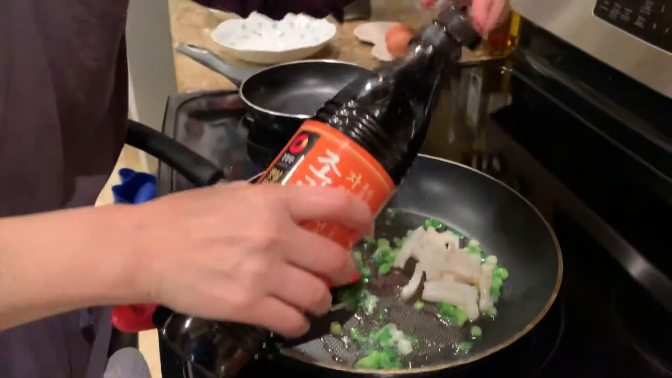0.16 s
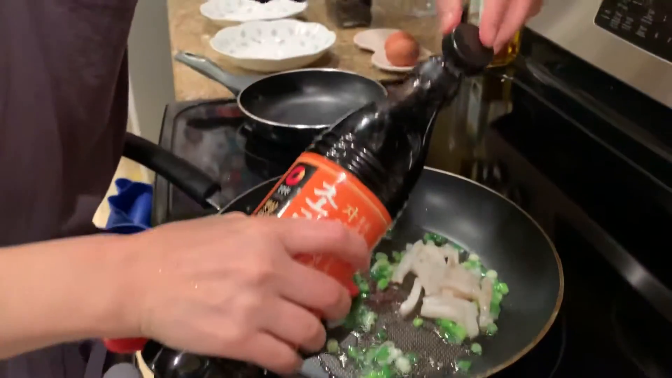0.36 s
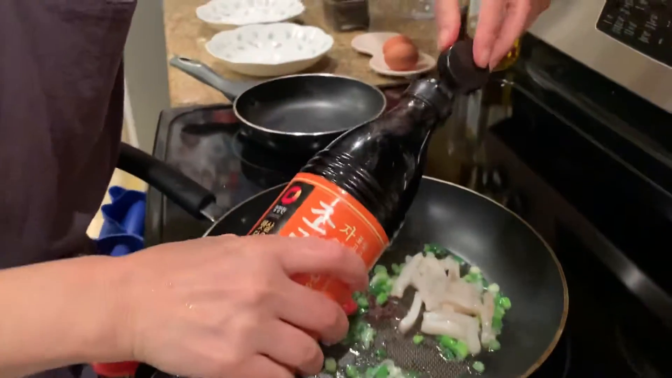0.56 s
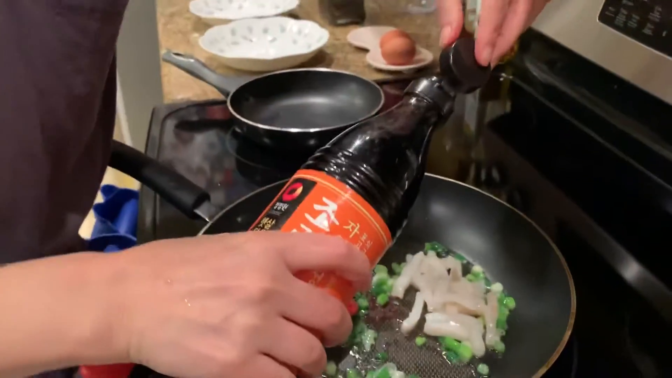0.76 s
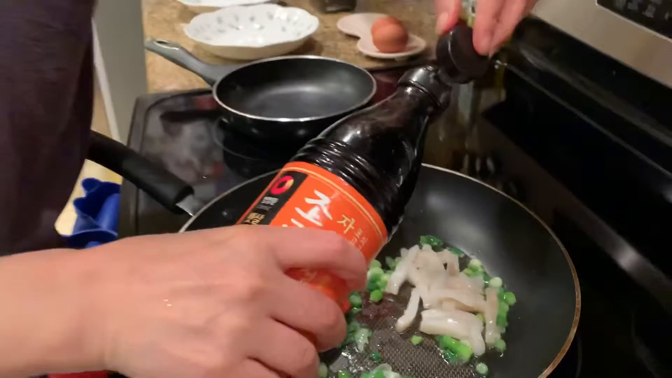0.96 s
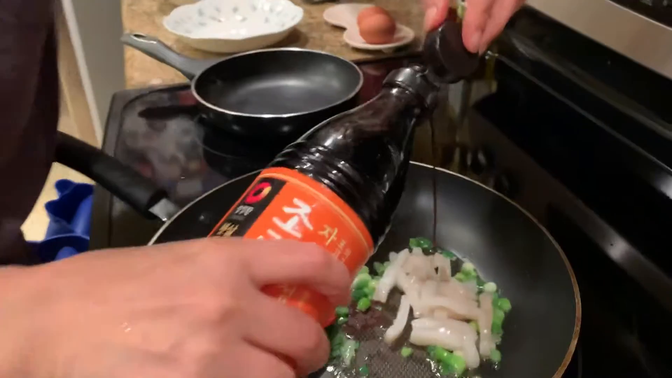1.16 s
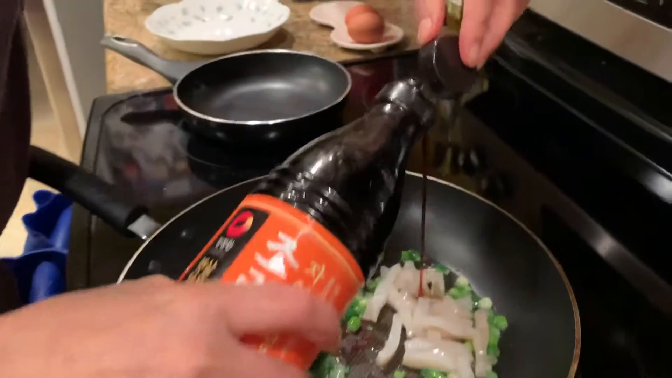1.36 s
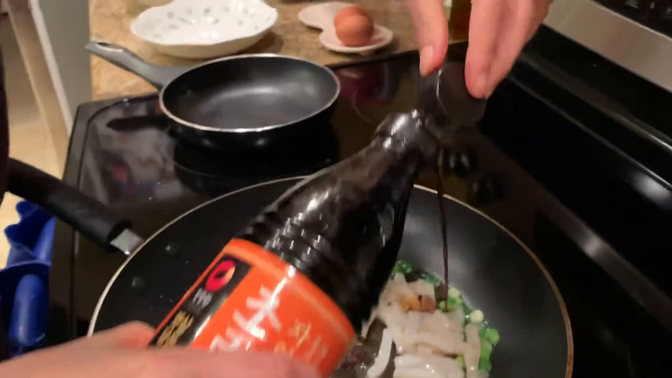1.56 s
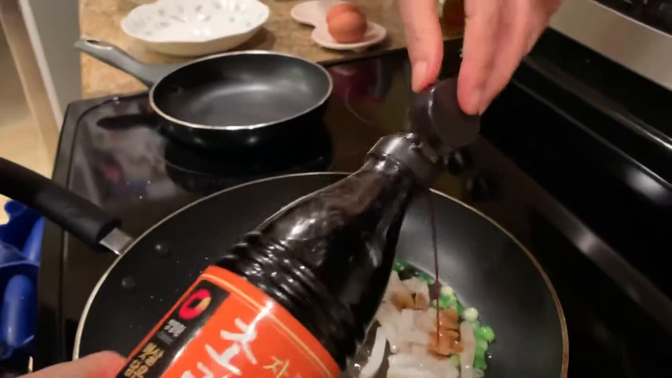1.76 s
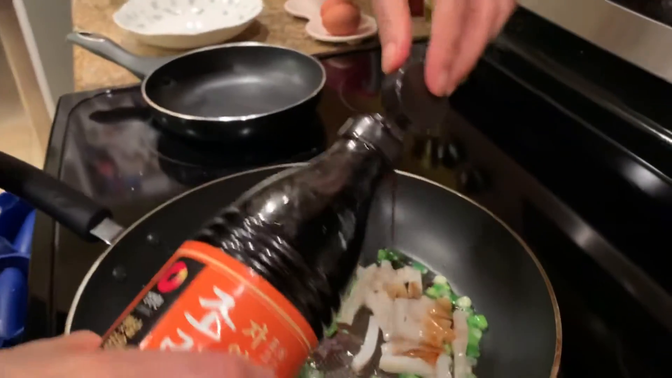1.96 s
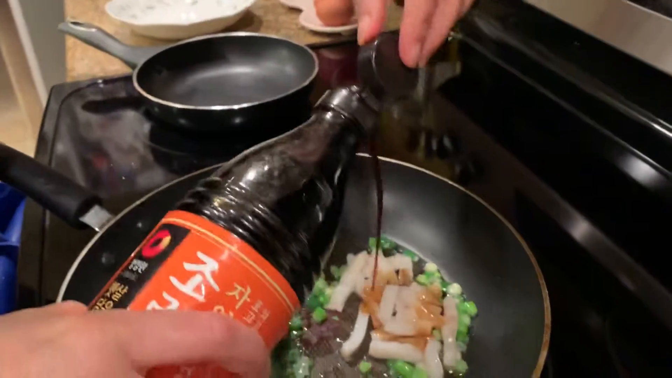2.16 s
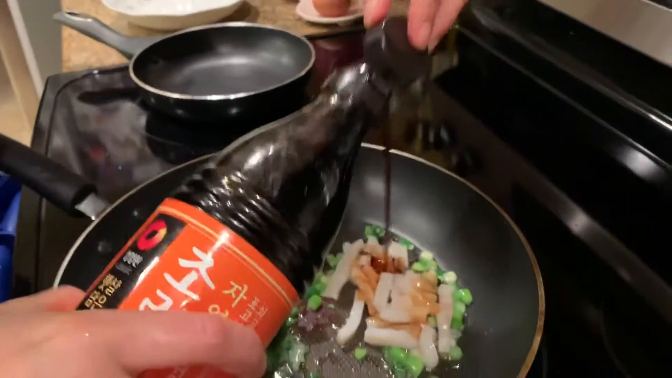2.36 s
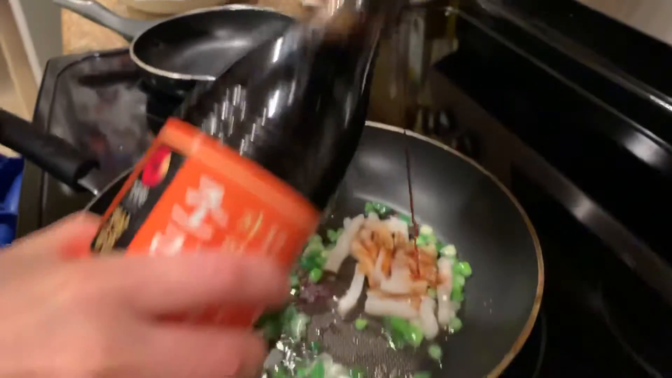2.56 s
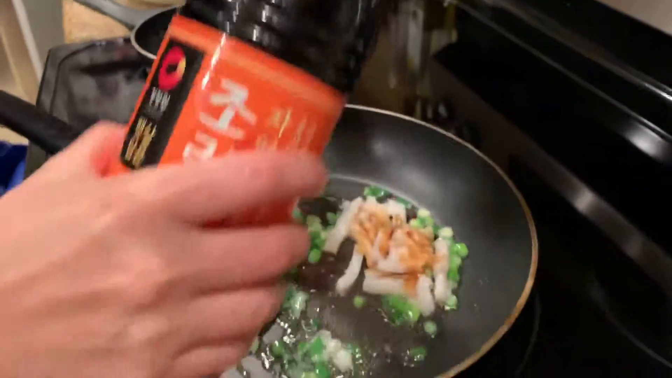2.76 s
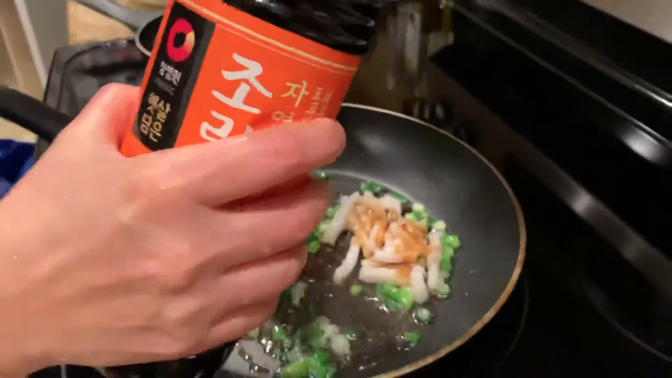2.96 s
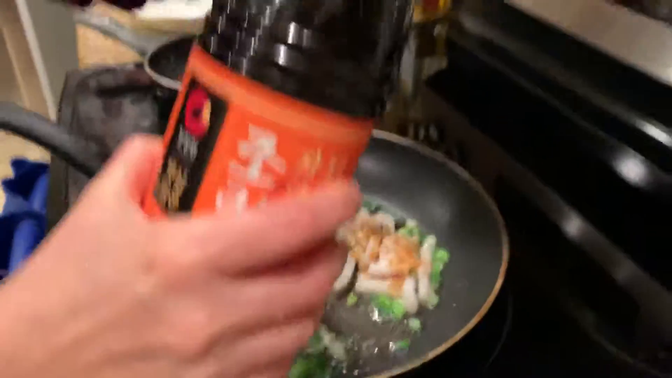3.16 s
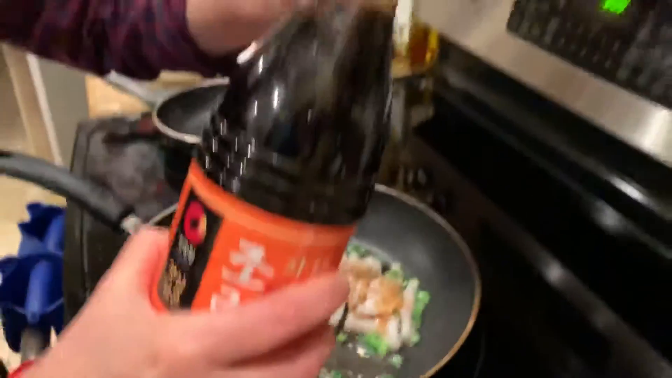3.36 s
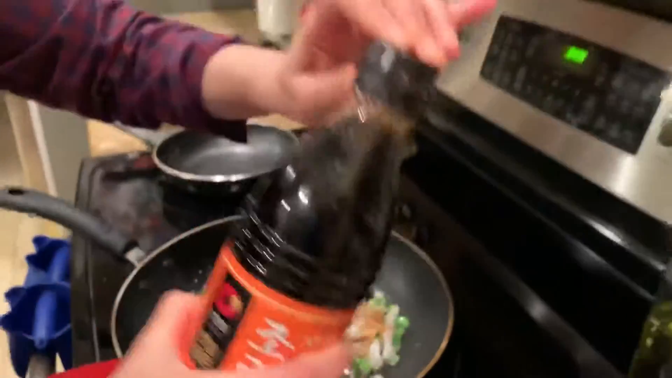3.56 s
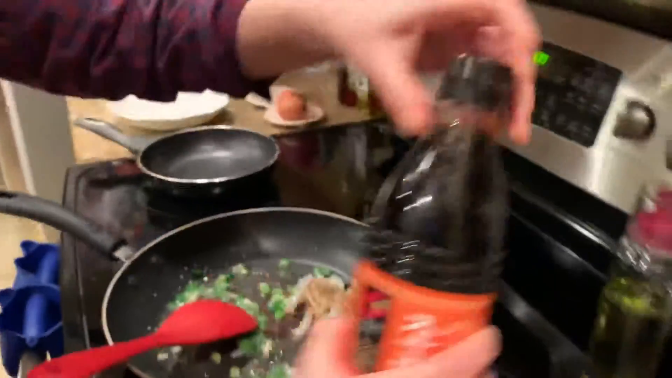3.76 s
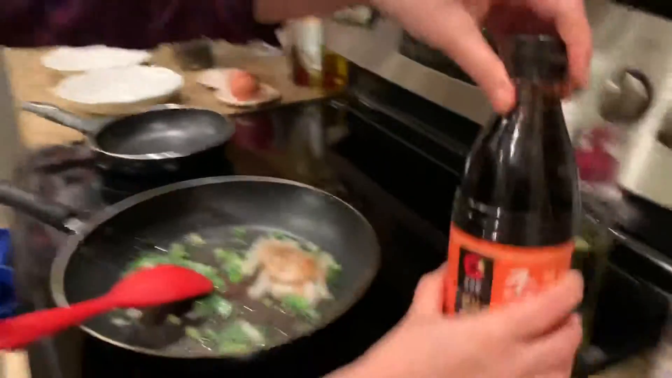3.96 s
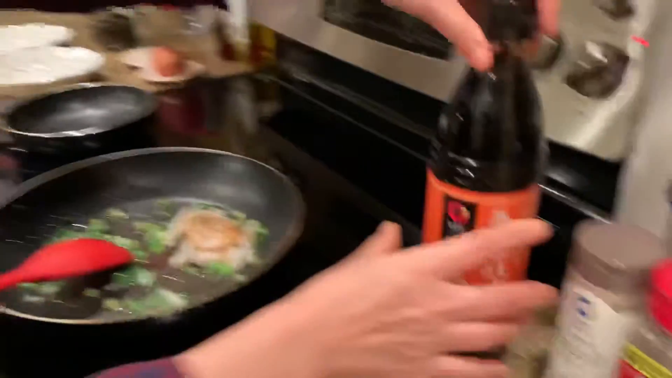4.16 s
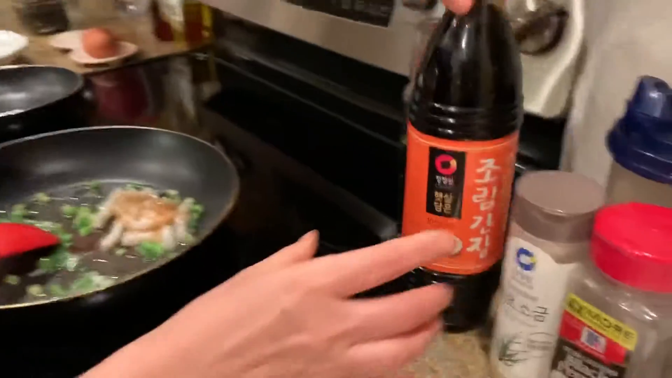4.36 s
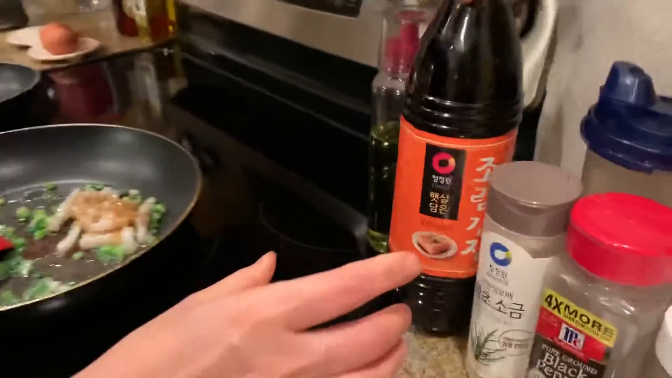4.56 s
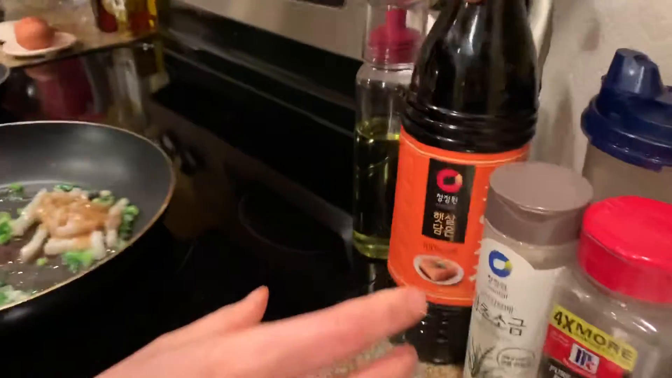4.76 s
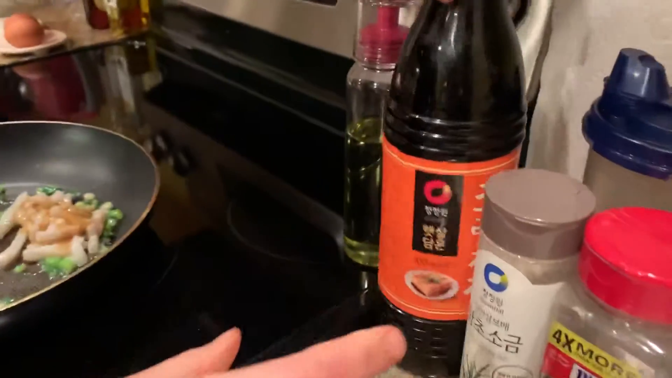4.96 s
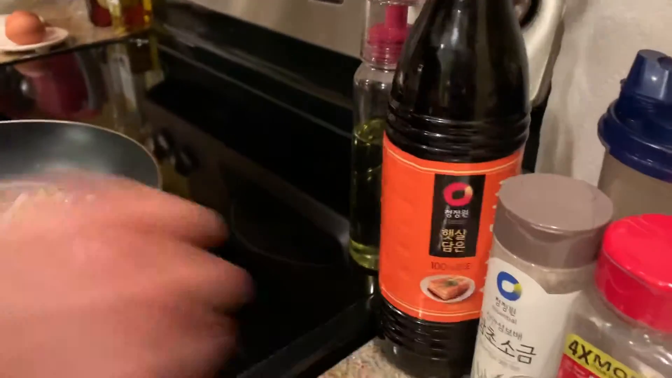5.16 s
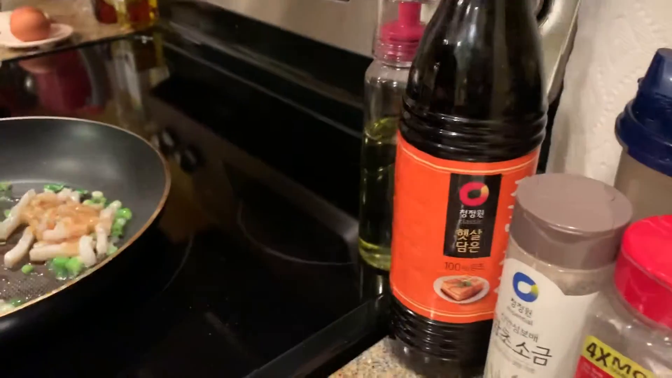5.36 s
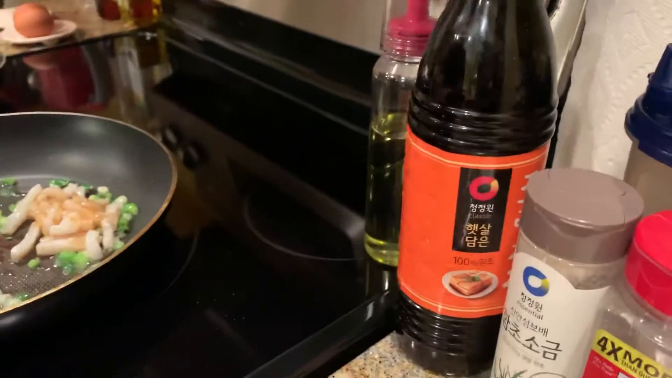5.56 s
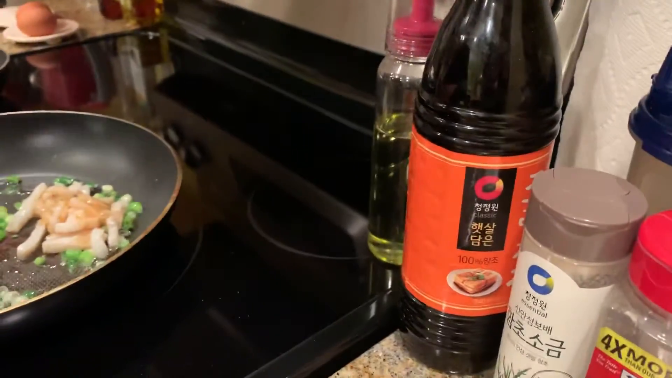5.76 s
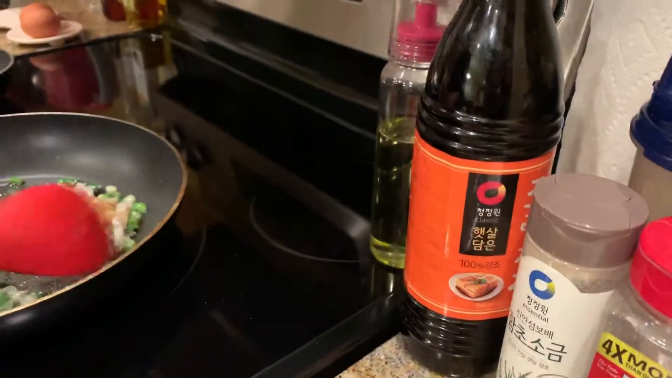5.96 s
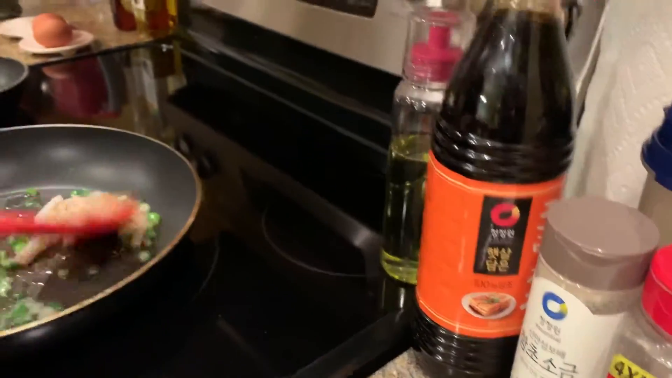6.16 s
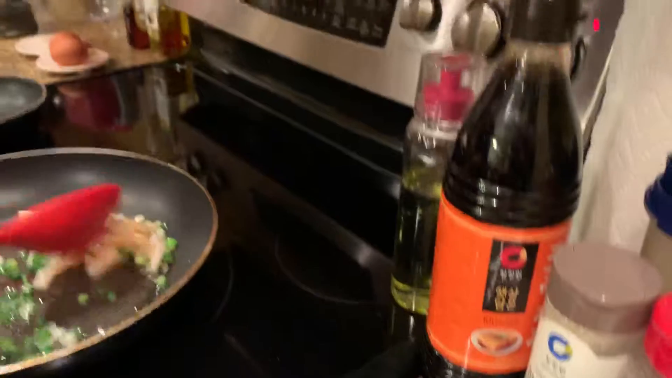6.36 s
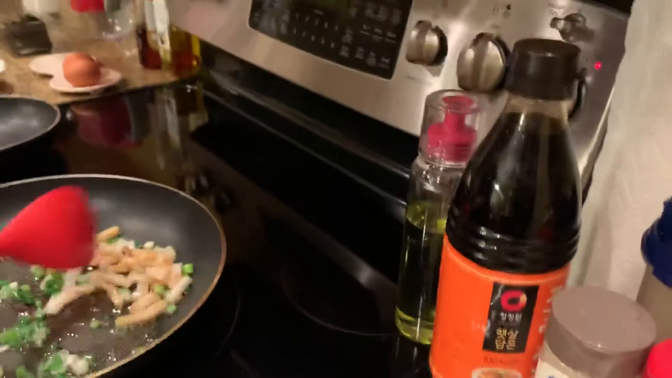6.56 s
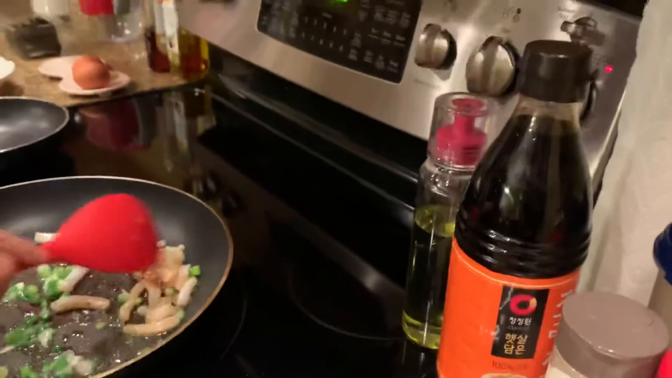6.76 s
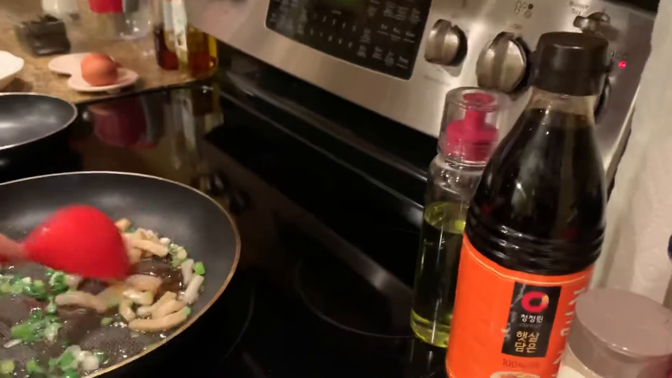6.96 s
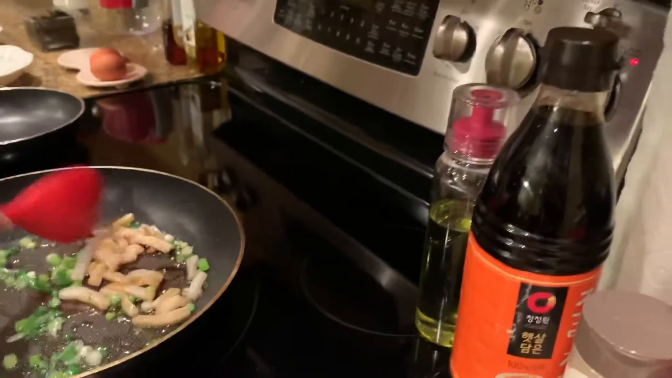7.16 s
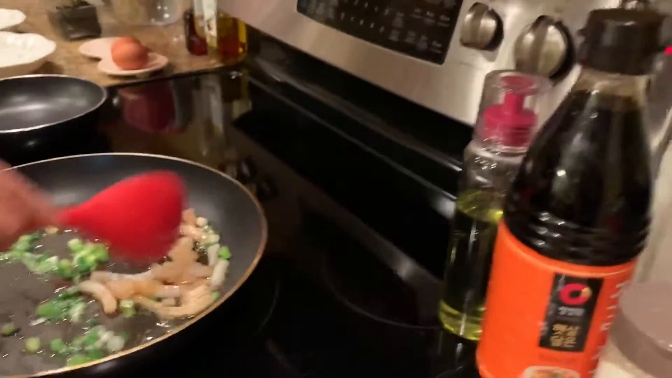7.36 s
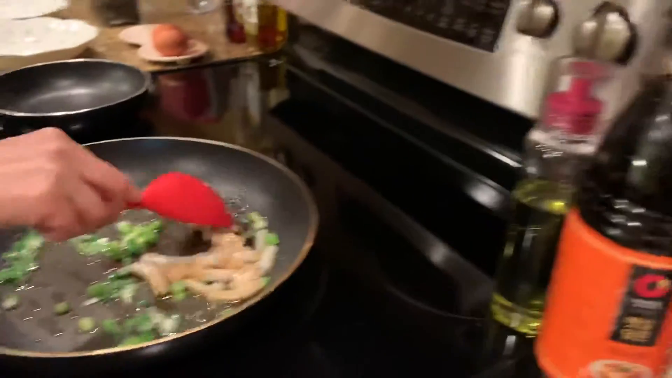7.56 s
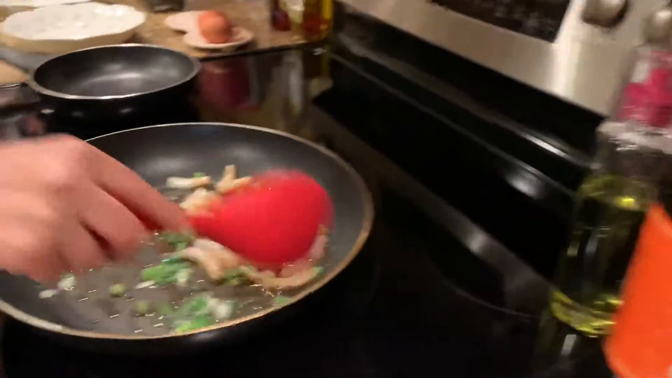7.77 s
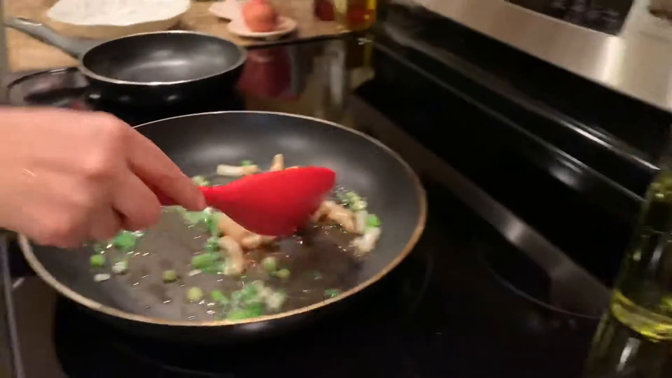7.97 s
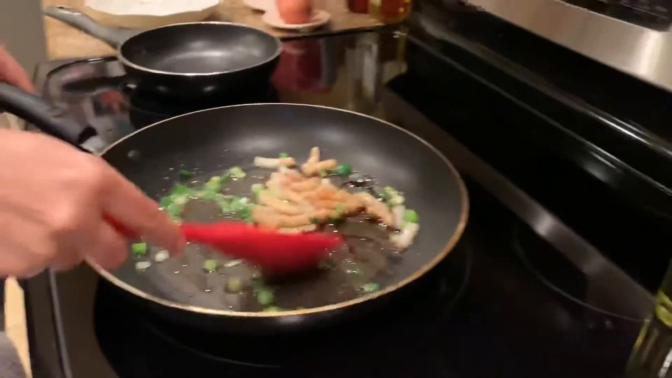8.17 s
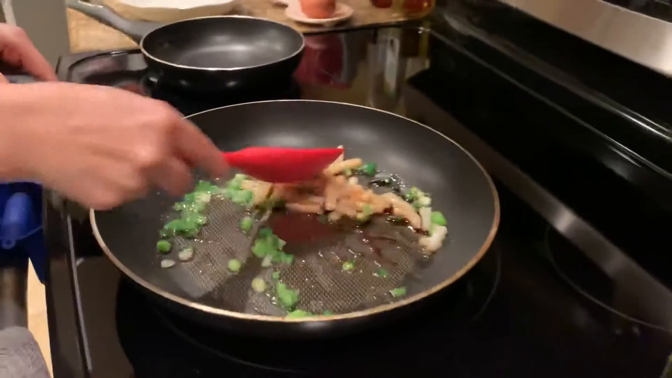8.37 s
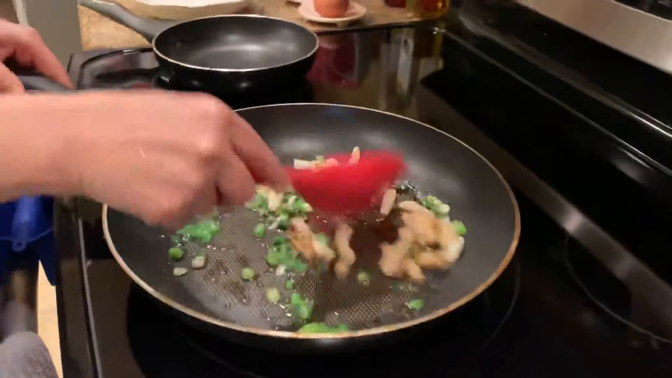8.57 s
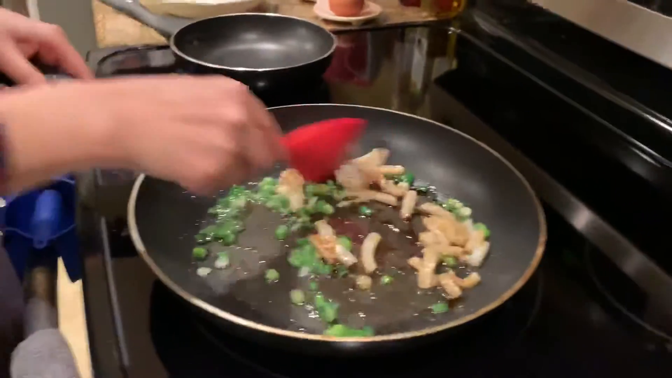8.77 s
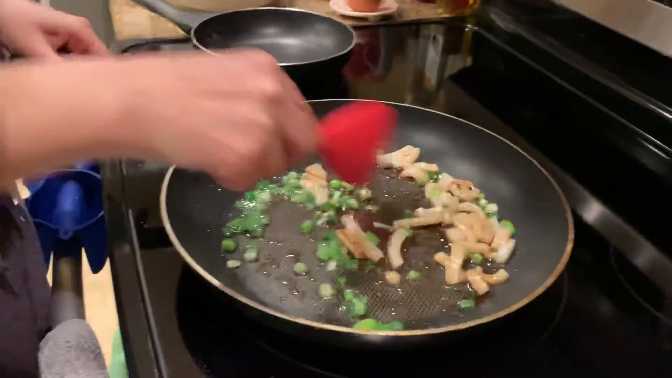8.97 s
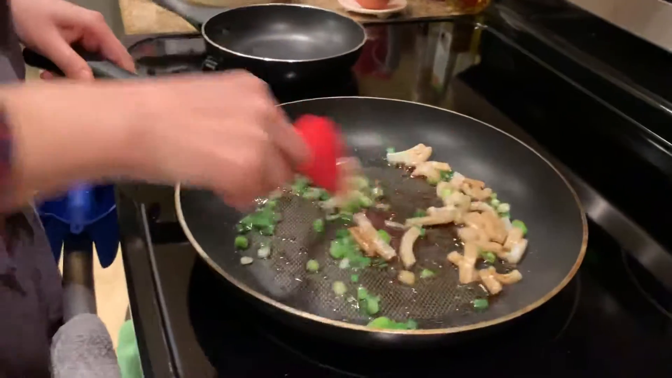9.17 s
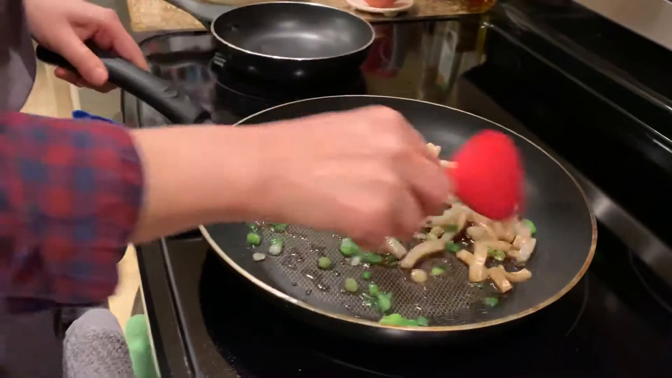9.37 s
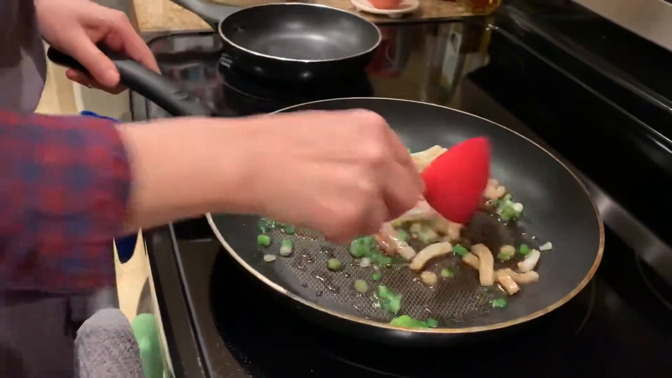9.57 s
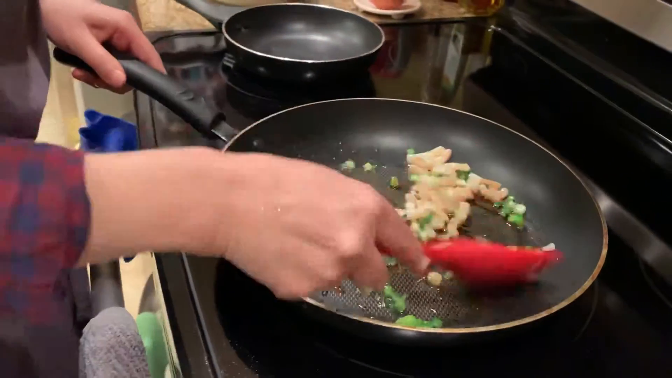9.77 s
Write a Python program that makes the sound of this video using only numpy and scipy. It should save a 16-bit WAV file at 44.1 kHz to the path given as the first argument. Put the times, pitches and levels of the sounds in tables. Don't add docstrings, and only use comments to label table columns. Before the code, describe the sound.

Close handheld stereo in a small kitchen. From 0 s a dense, bright sizzle of food in oil, with fine crackle, wet sauce bubbling and single spits. At about 0.9 s a bottle cap flips open with a small click. The frying swells from 0.7 to 2.4 s as sauce lands, with thin steam hisses, fizzes and plops, and a very sharp spit at 2.4. It then eases to a quieter simmering crackle. At 3.5 s the cap snaps shut firmly. Around 4.3 s the bottle lands on the stone counter with a low bump, then rattles and rocks at 4.7-5.3. A light spatula touch comes at 5.8, then dull thumps on the pan at 6.1, 6.7, 7.2, 7.9, 8.2, 8.8, 9.2 and 9.8, with sizzle surging strongly at 6.15 and 7.3, and more lightly later. Faint low house rumble lies underneath; room reflections are short.

```python
import sys
import numpy as np
from scipy import signal
from scipy.fft import rfft, irfft, next_fast_len
from scipy.io import wavfile
from scipy.ndimage import uniform_filter1d

SR = 44100
rng = np.random.default_rng(int(sys.argv[2]) if len(sys.argv) > 2 else 0)


def digitize_waveform(pressure):
    field = np.atleast_2d(pressure).T
    bounded = np.clip(field, -1, 1)
    quanta = np.round(bounded * 32767).astype(np.int16)
    wavfile.write(sys.argv[1], SR, quanta)


def volts_from_decibels(level):
    exponent = np.asarray(level, float) / 20
    return 10 ** exponent


N = 432621

# t/s, vigour/dB, wetness (sauce against crackle)/dB, loudest pocket f/Hz
FRYING = [(0, -44, -3.5, 3930), (.7, -41.5, -4.5, 3930), (1.2, -41, -4, 3480), (1.45, -40, -3.5, 2970),
          (2.0, -41.5, -2, 2780), (2.35, -41, -2, 3300), (2.6, -44, -1, 2800), (3.3, -46, -2, 3160),
          (3.8, -49.5, 0.9, 3880), (4.5, -46.5, -3.5, 3900), (5.05, -48.5, -1.6, 2980),
          (5.45, -48, 1, 3150), (5.9, -49, 0, 3630), (6.3, -48.5, -6.5, 4480), (7.3, -47.5, -6, 4080),
          (7.8, -48, -6.5, 3050), (8.6, -47, -4, 2680), (9.81, -48.5, -2, 3230)]
# t/s, surge/dB
STROKE_SURGES = [
    (6.15, 6.5),
    (7.33, 6.5),
    (7.9, 1.5),
    (8.2, 3),
    (9.26, 2.5),
]
# f/Hz, level per Hz/dB
CRACKLE_COLOUR = [(3000, -49), (4500, -0.5), (5600, 1.5), (7000, 9.5), (8300, 16), (10000, 13), (13000, 11),
                  (15800, 11.5)]
SAUCE_COLOUR = [(1200, -47.5), (1700, -12), (2100, 10.5), (2700, 19), (3400, 24), (4200, 27), (5200, 22.5),
                (6500, -60)]
SIMMER_COLOUR = [(260, -20), (380, -19), (600, 7), (850, 13), (1100, 10), (1450, 8.5), (2000, 14.5)]
# f/Hz, share [0-1]
COMMON_SHARE = [(100, 0.9), (500, .97), (1000, 0.8), (2000, 0.68), (3500, 0.55), (5500, 0.35)]
# f/Hz, width/Hz, level/dB
BOWL_MODES = [(619, 11, -4), (821, 34, -1), (959, 30, -3.5), (1414, 22, 5.5), (1817, 170, 0),
              (2094, 230, -2), (2465, 59, 1), (2780, 32, -9.5), (4360, 100, -13)]
# t/s of the peak, level/dB
SHUDDER_PEAKS = [(0.005, -55.5), (3.5, -72), (4.43, -82), (4.83, -59), (5.19, -81), (5.799, -68),
                 (6.08, -59), (7.92, -53), (8.25, -61), (9.32, -64)]
# f/Hz, level/dB
RUMBLE_COLOUR = [(20, 13), (40, 17.5), (65, 11.5), (120, 6.5), (200, -0.5), (400, -64)]
# t/s, peak level/dB, f/Hz
FIZZ_EVENTS = [(0.0233, -28.5, 4500), (0.119, -30, 4100), (0.5906, -56, 3620), (0.619, -26.5, 4250),
               (0.699, -29, 3600), (0.748, -31, 3540), (0.911, -27.5, 1870), (0.9112, -29.5, 2640),
               (1.118, -28.5, 3900), (1.2356, -36, 3960), (1.257, -29, 3330), (1.3374, -26.5, 3120),
               (1.4511, -26.5, 3190), (1.5, -32, 2540), (1.6378, -31.5, 2700), (1.69, -35, 2760),
               (1.7883, -30.5, 2120), (1.99, -49, 2120), (2.0363, -26, 2610), (2.242, -29, 4050),
               (2.2737, -31, 3980), (2.335, -25, 2780), (2.3948, -21.5, 4130), (2.395, -29, 2370),
               (1.462, -24, 4700), (2.5064, -27, 3800), (3.0542, -36, 2460), (3.2316, -36, 2460),
               (3.4342, -34, 2390), (3.4538, -34, 2520), (3.479, -32.5, 1820), (3.61, -81, 4420),
               (3.6257, -36, 1970), (4.197, -35, 3600), (4.989, -31, 3870), (5.678, -28, 3720),
               (6.1165, -34, 3600), (6.4345, -31, 3720), (6.7989, -32, 4350), (8.6903, -34, 2860),
               (8.762, -35, 3070), (8.9214, -30.5, 1900), (9.2396, -46, 1910), (9.2519, -38, 2750),
               (9.4519, -37, 3960), (9.4519, -34, 3860), (9.543, -39, 2500), (9.6016, -37.5, 2320)]
# t/s, length/s, f/Hz, level/dB
STEAM_VENTS = [(0.084, 0.32, 4120, -53), (0.48, 0.31, 3670, -49), (1.1, 0.136, 3800, -55),
               (1.25, 0.12, 3300, -62), (1.6, .08, 5700, -62), (1.57, 0.117, 3020, -44.5),
               (1.5, 0.33, 2600, -62), (2.03, 0.061, 2840, -47.5), (2.13, 0.26, 3000, -50.5),
               (1.5, .2, 4050, -51), (2.4, 0.1, 3880, -45), (1.3, .06, 4500, -48), (1.6, 0.049, 7900, -37),
               (1.56, 0.04, 9100, -35), (2.6, 0.073, 8000, -41), (6.1, .08, 832, -55),
               (7.7, .12, 1420, -62.5), (5.04, .1, 630, -56), (4.7, .04, 1150, -60),
               (5.55, 0.28, 2200, -59), (4.6, 0.288, 2200, -58)]
# t/s, peak level/dB, crack against ring/dB
SNAP_EVENTS = [(0.1755, -29, 7), (0.1935, -24, 7), (0.4803, -30, 7), (0.9123, -26, 7), (0.9692, -29, 7),
               (1.2131, -24, 7), (1.3598, -27, 7), (1.4506, -24, 7), (1.5, -19, 7), (1.5284, -27, 7),
               (1.7489, -27, 7), (1.9051, -27, 7), (2.152, -22, 7), (2.1899, -31, 7), (2.2752, -29, 7),
               (2.394, -12, 7), (2.4818, -26, 7), (2.5277, -24, 7), (3.4526, -30, 7), (3.4775, -34, 7),
               (3.6264, -25, 7), (3.8072, -25, 7), (3.8911, -26, 7), (3.9464, -32, 7), (4.1974, -26, 7),
               (4.2428, -30, 7), (4.7805, -30, 7), (1.5913, -25, 7), (6.1055, -30, 7), (6.318, -31, 7),
               (4.2572, -28, 7), (4.4233, -25, 7), (4.5151, -36, 7), (4.5341, -25, 7), (4.7087, -23, 7),
               (5.2116, -29, 7), (5.6206, -29, 7), (6.4363, -23, 7), (6.4812, -25, 7), (6.7987, -23, 7),
               (6.9511, -23, 7), (7.0658, -33, 7), (7.216, -23, 7), (7.3282, -31, 7), (7.6934, -21, 7),
               (8.1998, -21, 7), (8.2192, -30, 7), (8.3704, -32, 7), (8.6383, -31, 7), (8.7605, -25, 7),
               (8.8403, -31, 7), (9.0178, -29, 7), (9.3217, -31, 7), (9.394, -31, 7), (9.4564, -27, 7)]
# t/s, peak level/dB, f/Hz
PLOP_EVENTS = [(0.366, -30, 760), (1.463, -23, 3300), (2.397, -31, 1320), (1.268, -28.5, 890),
               (1.555, -29, 1890), (1.938, -31, 840), (2.13, -35, 615), (2.43, -28.5, 790),
               (2.481, -21, 1960), (2.708, -27.5, 680), (3.053, -33, 770), (3.232, -32, 480),
               (3.329, -32.5, 770), (4.454, -32, 554), (5.428, -33.5, 820), (6.184, -32.5, 830),
               (7.633, -33, 816), (8.76, -31, 1160), (9.073, -32, 910), (9.276, -28, 770),
               (9.601, -23, 860), (7.705, -31.5, 815), (6.672, -29.5, 860), (7.59, -42, 704),
               (4.665, -36, 600), (4.615, -39, 494), (9.791, -30, 754)]
# t/s, peak level/dB, f/Hz, crack against ring/dB
SPIT_EVENTS = [(0.4803, -32, 7370, -8), (2.072, -36, 8000, -18), (1.4528, -15, 7940, -13),
               (3.5748, -33, 8200, -8), (3.9853, -32, 7400, 0), (2.3351, -22.5, 8160, -16),
               (2.395, -12, 8160, 2), (2.4798, -19.5, 8800, -11), (2.5267, -31, 8400, 1),
               (2.6655, -16, 7100, -37), (2.9254, -23, 8400, -18), (3.4544, -27, 6800, 2),
               (3.8911, -51, 7500, 2), (3.9464, -35, 7300, 11), (4.424, -67, 8620, -12),
               (4.6808, -35, 8500, 3), (4.9242, -29, 8500, -10), (5.3612, -36, 8090, -17),
               (4.8183, -25, 8700, -11), (5.4282, -36, 8700, -8), (5.6232, -24, 8300, -79),
               (6.7196, -30, 4900, -8), (7.4583, -23, 8100, -11), (7.665, -21, 7900, -22),
               (7.7267, -31, 8080, -25), (8.447, -31, 7900, -29), (8.7615, -37, 4970, 1),
               (8.9635, -29, 8900, 1), (9.069, -33, 8500, -5), (9.2604, -26, 7800, 1)]
# t/s, peak level/dB
HARD_CRACKS = [(2.3942, -10), (3.627, -25), (3.8911, -26), (4.1976, -24), (6.7989, -27), (7.216, -23),
               (7.6934, -23), (8.2, -22), (9.0178, -27)]
# t/s, air in the neck level/dB, cap against it/dB
CAP_MOVES = [
    (0.91, -56.5, 18.5),
    (3.479, -25, 0.5),
]
# f/Hz, level/dB, t60/s
NECK_MODES = [(185, -5.5, 0.051), (307, -1, 0.02)]
CAP_MODES = [(426, 0, 0.057), (633, 5.5, 0.032), (770, -4, 0.075), (860, 5, 0.036), (1150, 1, 0.03),
             (1310, -10, 0.069), (1830, -11, 0.031), (2440, -11, 0.012), (2980, -3, .012)]
# t/s, peak level/dB, edge hardness/dB
SPATULA_THUMPS = [(5.828, -34.5, -8), (2.71, -44, -14), (6.073, -18, -8.5), (6.128, -27, -9),
                  (7.59, -53, -14), (6.378, -52, -11), (6.667, -18, -18.5), (6.949, -67, 9),
                  (7.247, -21.5, -24), (7.876, -25, -13.5), (7.919, -29.5, -12), (8.172, -26.5, -21),
                  (8.813, -26, -43), (9.212, -19, -22), (9.271, -42, -10), (9.538, -31.5, -36),
                  (9.78, -25.5, -12)]
# f/Hz, level/dB, t60/s
HOB_MODES = [(62, -15, 0.56), (74.5, -13.5, 0.47), (117.1, -11.5, 0.44), (147.3, 0, 0.12), (166, 3, 0.11),
             (207.6, -4.5, 0.12)]
PAN_EDGE_MODES = [(241, -2.5, 0.12), (343, -7, 0.06), (447, -9.5, 0.098), (530, -12, 0.05),
                  (644, -20, 0.013), (805, -16.5, 0.058)]
# t/s, counter boom level/dB, bottle against it/dB
BOTTLE_KNOCKS = [(4.149, -79, 21), (4.292, -24.5, -9.5), (4.335, -22, -19.5), (4.732, -39, 1.5),
                 (4.746, -38.5, -2.5), (4.76, -32, -7), (4.804, -40, 0), (4.814, -41, -7),
                 (4.824, -41, -6.5), (4.833, -45, -7), (4.881, -50, -3), (5.004, -44, -12),
                 (5.147, -33.5, -16.5), (5.2, -34.5, -21), (5.27, -41, -20)]
# f/Hz, level/dB, t60/s
COUNTER_MODES = [(43.8, -9.5, 1), (60.6, -9, 1), (82.6, 1, 0.28), (113.5, -3.5, 0.26), (132.6, -3, 0.23),
                 (196, -3, 0.11)]
BOTTLE_MODES = [(251, 6, 0.087), (314, 6.5, 0.047), (400, -4, 0.12), (545, 4.5, 0.069), (599, 5.5, 0.051),
                (718, -3, 0.062), (910, -3.5, 0.065), (1197, -7, 0.06), (1335, -11, 0.18),
                (1617, -6.5, 0.043)]
# t/s, right behind left/samples
RIGHT_LAG = [(0, 0.16), (.5, 0.51), (1.5, 2.36), (3.5, 3.1), (4, 5.8), (4.6, 10.1), (6.2, 9.8), (6.6, 9),
             (7.6, 8.55), (8.1, 4.5), (8.6, 3.76), (9.1, 3.3), (9.81, 1.3)]
# f/Hz, left against right level/dB
LEFT_TILT = [(60, -2.5), (250, 1), (1000, 3), (2200, 3.5), (4000, -.5), (5800, -4.5), (7500, -10)]
BAND_EDGES = [64, 72, 80, 88, 96, 108, 120, 132, 144, 160, 176, 196, 216, 228, 240, *range(256, 737, 16)]


def rms_one(x):
    return x / np.sqrt(np.mean(x ** 2) + 1e-20)


def in_time(rows):
    s, *columns = np.transpose(rows)
    return [np.interp(np.arange(N) / SR, s, c) for c in columns]


def at_hz(points, hz):
    table_hz, values = np.array(points).T
    return np.interp(np.log(hz), np.log(table_hz), values)


def drift(rate):
    r = np.exp(-80 * np.pi * rate / SR)
    slow = signal.lfilter([1], [1, -2 * r, r * r], rng.standard_normal(N // 40 + 2002))[2000:]
    return np.interp(np.arange(N) / 40, np.arange(len(slow)), rms_one(slow))


def swells(events, rise_s, fall_s):
    t = np.arange(N) / SR
    return sum(height * np.exp(np.where(t < s, (t - s) / rise_s, (s - t) / fall_s)) for s, height in events)


def ring(clicks, hz, t60):
    r, w = volts_from_decibels(-60 / (t60 * SR)), 2 * np.pi * hz / SR
    return signal.lfilter([0, np.sin(w)], [1, -2 * r * np.cos(w), r * r], clicks + 1e-18)


def highpass(x, order, hz):
    return signal.sosfilt(signal.butter(order, hz, "high", fs=SR, output="sos"), x)


def bursting(colour, per_s, spread_db, cycles, clump_db, hiss, count, favour_db=0):
    clumps = volts_from_decibels(clump_db * (drift(12.4) + 1.06 * drift(74)))
    born = rng.random((3, N)) < per_s / SR
    sizes = volts_from_decibels(spread_db * np.minimum(rng.exponential(1, (3, N)), 5)) * rng.choice([-1, 1], (3, N))
    bursts = born * sizes * clumps
    bursts /= np.sqrt(np.mean(bursts ** 2) / count)
    dealt = rng.integers(0, count, N)
    pocket_hz = in_time(FRYING)[2]
    steam = rng.standard_normal((2, 3, N))
    out = 0
    for k, hz in enumerate(np.geomspace(colour[0][0], colour[-1][0], count)):
        alike = np.clip(at_hz(COMMON_SHARE, hz), 0, 1)
        drive = bursts * (dealt == k) + hiss * steam[k % 2]
        drive = np.sqrt(alike) * drive[0] + np.sqrt(1 - alike) * drive[1:]
        patch = volts_from_decibels(at_hz(colour, hz) + clump_db * drift(22))
        patch *= volts_from_decibels(favour_db * np.exp(-(np.log(hz / pocket_hz) / 0.16) ** 2))
        out = out + patch * hz * ring(drive, hz, cycles / hz) / np.sin(2 * np.pi * min(hz / SR, .25))
    return rms_one(highpass(out, 3, colour[0][0]))


def ticks(per_s, spread_db, low_hz):
    decay_s = .001
    sizes = volts_from_decibels(spread_db * np.minimum(rng.exponential(1, N), 2.5)) * (rng.random(N) < per_s / SR)
    fading = signal.lfilter([1], [1, -np.exp(-1 / (decay_s * SR))], sizes)
    return rms_one(highpass(fading * rng.standard_normal(N), 2, low_hz))


def bowl(x):
    out = x.copy()
    for hz, width_hz, gain_db in BOWL_MODES:
        r = np.exp(-np.pi * width_hz / SR)
        poles = [1, -2 * r * np.cos(2 * np.pi * hz / SR), r * r]
        out += volts_from_decibels(gain_db) * signal.lfilter([(1 - r * r) / 2, 0, (r * r - 1) / 2], poles, x)
    return out


def rumble():
    white = rng.standard_normal((2, N))
    f = np.maximum(np.arange(N // 2 + 1) * SR / N, 1)
    above, below = np.maximum(np.log2(f / 400), 0), np.maximum(np.log2(18 / f), 0)
    shape = volts_from_decibels(at_hz(RUMBLE_COLOUR, f) - 12 * above - 18 * below)
    mid, side = irfft(rfft(white) * shape, N)
    return rms_one(mid + .08 * side * [[1], [-1]])


def pops(events, spray_s, crack_s, cycles, gain_db, crack_hz):
    out, t = np.zeros(N + 2000), np.arange(2000) / SR
    spray = rng.standard_normal((len(events), len(t)))
    spray[:, 0] = 3
    for (s, peak_db, hz, crack_db), noise in zip(events, spray):
        fading = np.exp(-t / spray_s)
        tone = highpass(ring(noise * fading, hz, cycles / hz), 2, hz / 2)
        crack = highpass(noise * (np.exp(-t / crack_s) + 0.077 * fading), 2, crack_hz)
        burst = tone / np.abs(tone).max() + volts_from_decibels(crack_db) * crack / np.abs(crack).max()
        i = round(s * SR)
        out[i:i + len(t)] += volts_from_decibels(peak_db + gain_db) * burst
    return out[:N]


def single_bursts():
    delay_s = .0009
    fizzes = [(*row, -4) for row in FIZZ_EVENTS]
    snaps = [(s + delay_s, db, 12400, crack_db) for s, db, crack_db in SNAP_EVENTS]
    snaps += [(s + delay_s, db, 15400, 0) for s, db in HARD_CRACKS]
    plops = [(*row, -30) for row in PLOP_EVENTS]
    out = pops(fizzes, spray_s=.0076, crack_s=.0005, cycles=9.3, gain_db=-1.8, crack_hz=1500)
    out += pops(snaps, spray_s=.0012, crack_s=.0003, cycles=10.6, gain_db=-1.5, crack_hz=5100)
    out += pops(plops, spray_s=.0083, crack_s=.0012, cycles=4.3, gain_db=-10.5, crack_hz=350)
    return out + pops(SPIT_EVENTS, spray_s=.0018, crack_s=.0003, cycles=14.0, gain_db=.73, crack_hz=2800)


def vents():
    width, edge_s = .071, .016
    t, out = np.arange(N) / SR, np.zeros((2, N))
    flutter = volts_from_decibels(3.5 * drift(73))
    for s, length, hz, level_db in STEAM_VENTS:
        part = slice(max(int((s - .1) * SR), 0), int((s + length + .1) * SR))
        white = rng.standard_normal((3, SR))[:, :len(t[part])]
        edges_hz = [hz * (1 - width / 2), hz * (1 + width / 2)]
        band = signal.butter(2, edges_hz, "band", fs=SR, output="sos")
        hiss = rms_one(signal.sosfilt(band, white[0] + .8 * white[1:]))
        shape = np.clip(np.minimum(t[part] - s, s + length - t[part]) / edge_s + .5, 0, 1)
        out[:, part] += volts_from_decibels(level_db) * shape * flutter[part] * hiss
    return out


def frying(vigour_db, wet_db, shudder):
    vigour_db = vigour_db + swells(STROKE_SURGES, rise_s=.011, fall_s=.14)
    simmer_db = -57.5 + .59 * (vigour_db - vigour_db.mean()) + (wet_db - wet_db.mean())
    slosh = volts_from_decibels(simmer_db) + volts_from_decibels(9 - 8.5) * shudder
    fry = volts_from_decibels(vigour_db + 4.5) * bursting(CRACKLE_COLOUR, 9000., spread_db=3.4, cycles=13.6,
                                          clump_db=1.9, hiss=.54, count=16)
    fry += volts_from_decibels(vigour_db + wet_db - .5) * bursting(SAUCE_COLOUR, 4000., spread_db=2.7, cycles=13.1,
                                                   clump_db=1.5, hiss=.22, count=16, favour_db=3.0)
    fry += slosh * bursting(SIMMER_COLOUR, 1500., spread_db=1.6, cycles=6.9, clump_db=3.4, hiss=.87, count=10)
    fry += volts_from_decibels(vigour_db - 5) * ticks(220.0, spread_db=4.3, low_hz=8900) + vents()
    return bowl(signal.sosfilt(signal.cheby2(12, 50, 16250, fs=SR, output="sos"), fry))


def struck(times, peaks_db, modes, soft_hz, scatter_db, rattle_s):
    at = np.round(np.array(times) * SR).astype(int)
    out, t = np.zeros(N), np.arange(4000) / SR
    luck = rng.standard_normal((len(at), len(modes)))
    rattle = rng.standard_normal((len(at), len(t))) * np.exp(-t / rattle_s) / np.sqrt(rattle_s * SR)
    contact = .45 * rattle + (t == 0)
    for k, (hz, level_db, t60) in enumerate(modes):
        force = np.zeros(N + len(t))
        for i, peak_db, touch, chance in zip(at, peaks_db, contact, luck[:, k]):
            force[i:i + len(t)] += volts_from_decibels(peak_db + level_db + scatter_db * chance) * touch
        out += ring(force[:N], hz, t60) * (-1) ** k
    r = np.exp(-2 * np.pi * soft_hz / SR)
    return signal.lfilter([(1 - r) ** 2], [1, -2 * r, r * r], out)


def cap():
    s, neck_db, lid_db = np.transpose(CAP_MOVES)
    neck = struck(s, neck_db + 4.5, NECK_MODES, 3000, 0, .0015)
    return neck + struck(s, neck_db + lid_db - 5.5, CAP_MODES, 8000, 0, .00057)


def knocks(events, body, edge, soft_hz, rattle_s):
    s, peak_db, hard_db = np.transpose(events)
    boom = struck(s, peak_db - 9.5, body, soft_hz, 1.5, rattle_s)
    return boom + struck(s, peak_db + hard_db - 3.5, edge, 4300, 2.5, rattle_s)


def spatula():
    return knocks(SPATULA_THUMPS, HOB_MODES, PAN_EDGE_MODES, 350, .007)


def bottle():
    return knocks(BOTTLE_KNOCKS, COUNTER_MODES, BOTTLE_MODES, 810, .006)


def kitchen(x, t60, cut_hz):
    size = next_fast_len(N + SR)
    f = np.arange(size // 2 + 1) / size
    loss = 1 + (f * SR / cut_hz) ** 2
    spectrum = rfft(x, size) / (1 + (170 / SR / (f + 1e-9)) ** 2)
    sides = []
    for lags in rng.uniform(.011, .037, (2, 8)) * SR:
        loops = [volts_from_decibels(-60 * d / SR / t60 * loss) * np.exp(-2j * np.pi * f * d) for d in lags]
        sides.append(irfft(spectrum * sum(g / (1 - g) for g in loops), size)[:N])
    return np.array(sides)


def nearer_left(pair):
    lows = signal.sosfiltfilt(signal.butter(2, 1400, fs=SR, output="sos"), pair[1])
    late = np.arange(N) - in_time(RIGHT_LAG)[0]
    pair[1] = lows + np.interp(late, np.arange(N), pair[1] - lows)
    return pair


def scene():
    vigour_db, wet_db, _ = in_time(FRYING)
    shudder = swells([(s, volts_from_decibels(db)) for s, db in SHUDDER_PEAKS], rise_s=.04, fall_s=.039)
    pan = nearer_left(frying(vigour_db, wet_db, shudder) + single_bursts())
    house = volts_from_decibels(7.0) * (volts_from_decibels(-70.5) + shudder) * rumble()
    lid = cap()
    blows = spatula() + bottle()
    room = volts_from_decibels(-11) * kitchen(blows + volts_from_decibels(-9) * lid, t60=.25, cut_hz=1500)
    return pan + blows + lid + room + house


def thin_bands(pair):
    count = N // 1024 + 3
    both = np.pad([pair[0] + pair[1], pair[0] - pair[1]], ((0, 0), (1633, 4096)))
    both = both[:, :(count + 1) * 1024] / 2
    bell = np.kaiser(1025, 4 * np.pi)
    rise = np.sqrt(np.cumsum(bell)[:-1] / bell.sum())
    cosines = np.cos(np.pi / 1024 * np.outer(np.arange(2048) + 512.5, np.arange(1024) + .5))
    basis = np.r_[rise, rise[::-1]][:, None] * cosines
    halves = both.reshape(2, -1, 1024)
    lines = np.concatenate([halves[:, :-1], halves[:, 1:]], axis=2) @ basis
    steps = (np.diff(both[0] + both[1]) ** 2)[512:512 + count * 1024].reshape(-1, 8, 128).mean(axis=2)
    calm, tame = (steps.max(axis=1) < volts_from_decibels(2 * db) * np.median(steps, axis=1) for db in (8.3, 11.5))
    for low, high in zip(BAND_EDGES, BAND_EDGES[1:]):
        drop_db, step_share = (-5, .75) if low >= 352 else (-7.3, .95)
        band = lines[:, :, low:high]
        power = np.mean(band ** 2, axis=2) + 1e-20
        ragged_db = 2.2 * uniform_filter1d(rng.standard_normal(power.shape), size=3) * np.sqrt(3)
        under_db = drop_db + np.array([[0], [.9]]) + ragged_db
        weak = power < power[::-1] * volts_from_decibels(2 * under_db)
        step = step_share * np.sqrt(power.max(axis=0))[:, None]
        rounded = np.sign(band) * step * np.floor(np.abs(band / step) ** .75 + .4) ** (4 / 3)
        lines[:, :, low:high] = np.where(calm[:, None], rounded * ~weak[:, :, None], band)
    lines[:, :, BAND_EDGES[-1]:] *= ~tame[:, None]
    lines[:, :, 790:] = 0
    frames = lines @ basis.T / 512
    mid, side = (frames[:, :-1, 1024:] + frames[:, 1:, :1024]).reshape(2, -1)[:, 609:609 + N]
    return np.array([mid + side, mid - side])


def roll_off(x):
    return signal.sosfilt(signal.butter(12, 17000, fs=SR, output="sos"), x)


def record(dry):
    size = next_fast_len(N + 64)
    f = np.maximum(np.arange(size // 2 + 1) * SR / size, 1)
    left, right = rfft(dry, size)
    turn = np.pi / 2 * np.clip((f - 6200) / 1800 + .5, 0, 1)
    shared = .7 * turn
    tilt = volts_from_decibels(at_hz(LEFT_TILT, f) / 2 * np.cos(turn))
    lag = 11.5
    late = np.exp(-2j * np.pi * (f * lag / SR - 2.03) * np.clip((f - 5000) / 900, 0, 1))
    pair = np.array([left * tilt * late, right / tilt * np.cos(shared) + left * np.sin(shared)])
    mix = thin_bands(irfft(pair, size)[:, :N])
    return roll_off(mix)


dry = scene()
out = record(dry)
digitize_waveform(out)
```